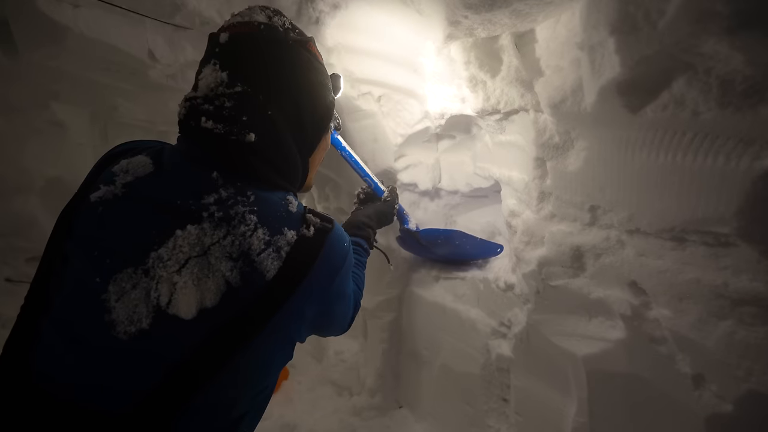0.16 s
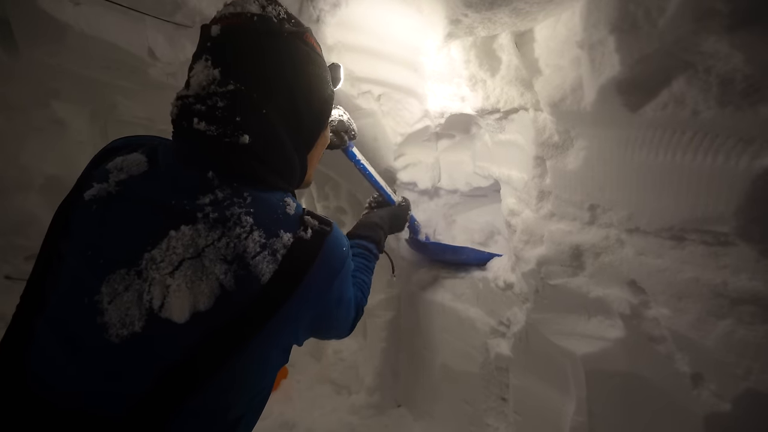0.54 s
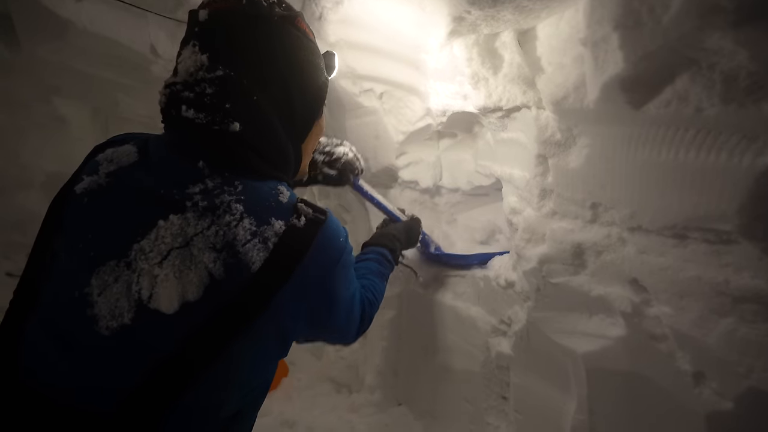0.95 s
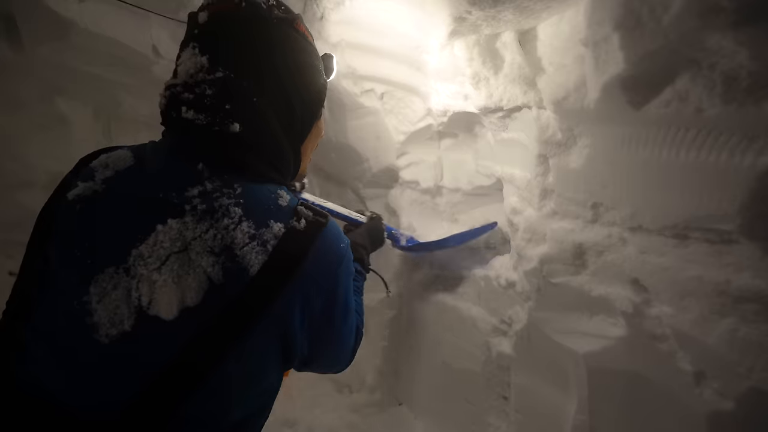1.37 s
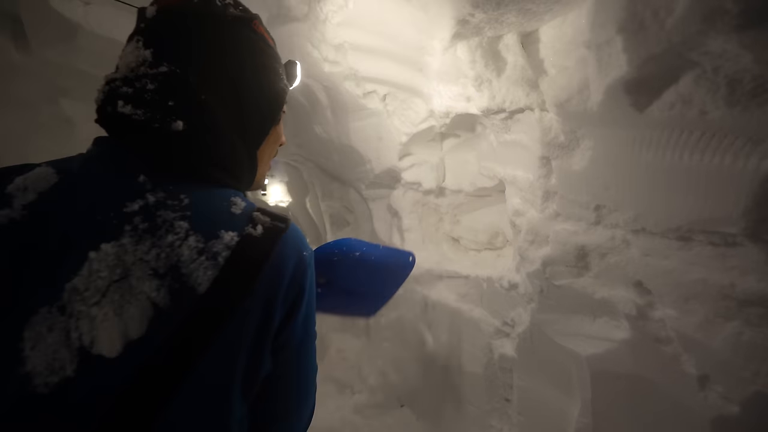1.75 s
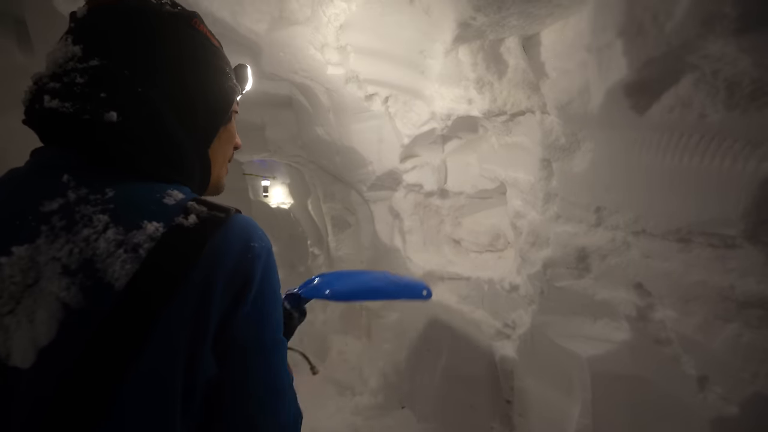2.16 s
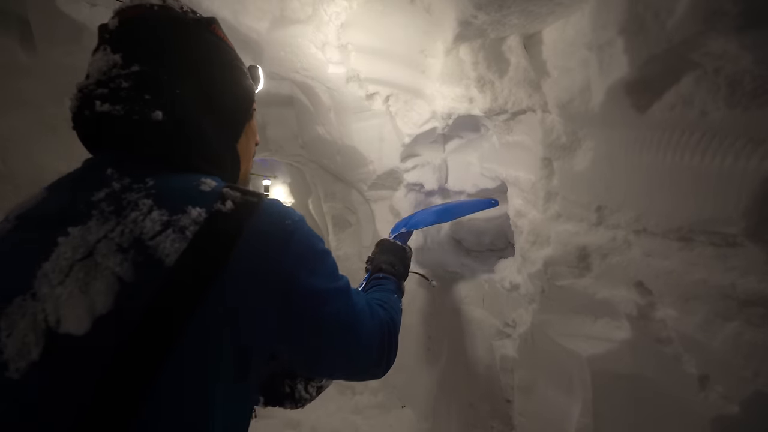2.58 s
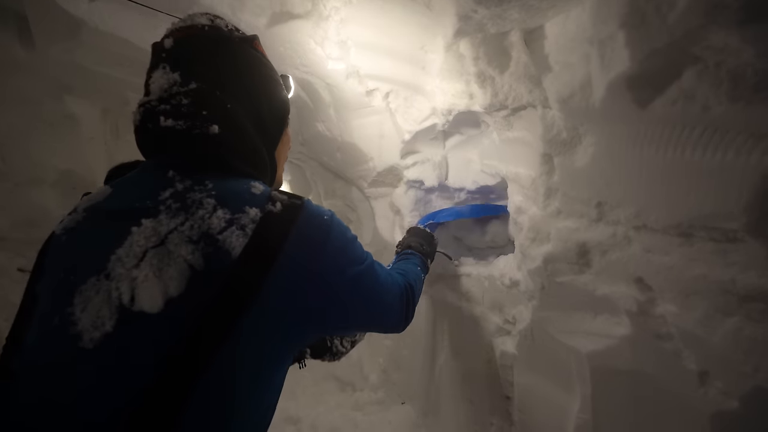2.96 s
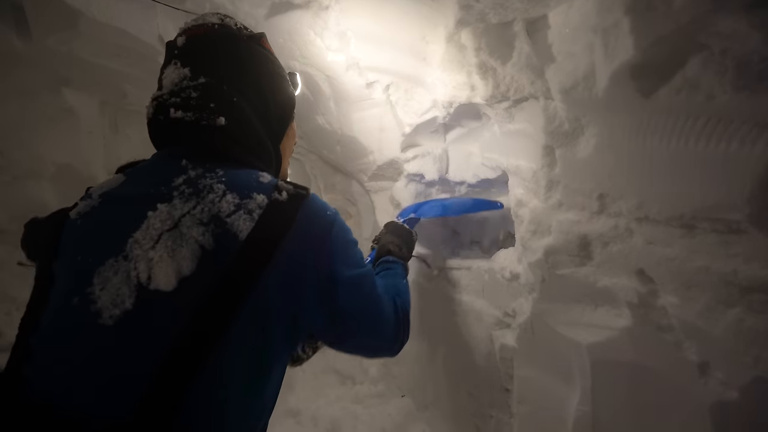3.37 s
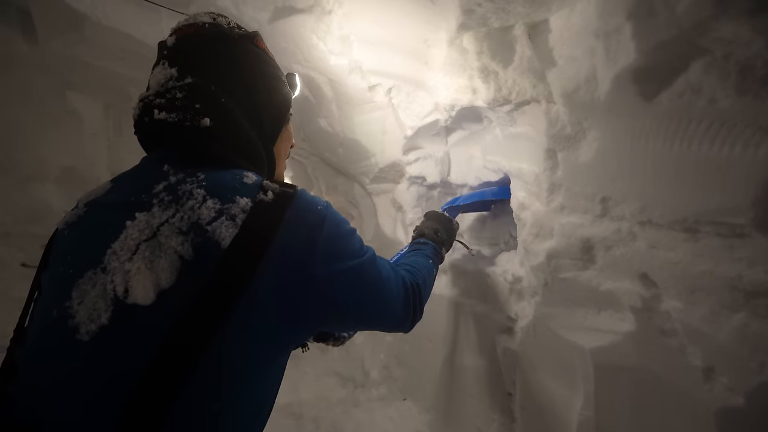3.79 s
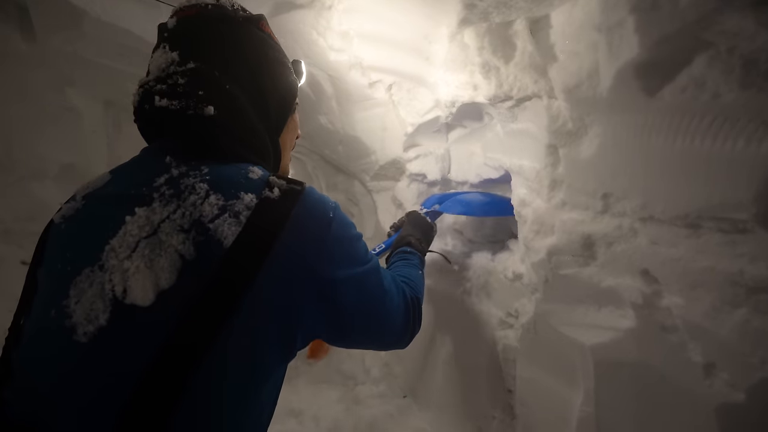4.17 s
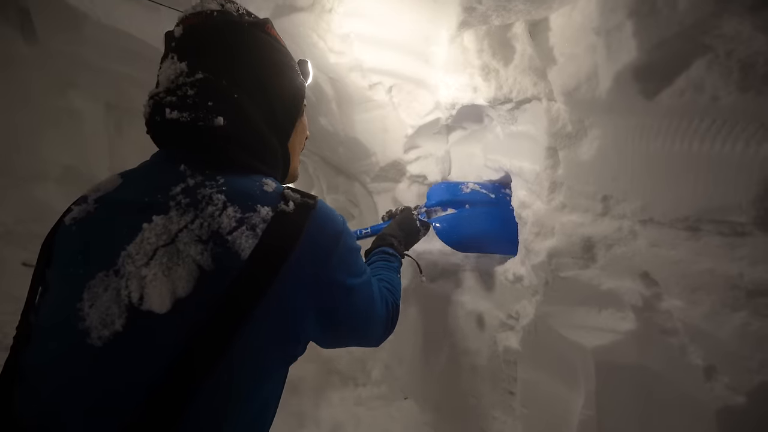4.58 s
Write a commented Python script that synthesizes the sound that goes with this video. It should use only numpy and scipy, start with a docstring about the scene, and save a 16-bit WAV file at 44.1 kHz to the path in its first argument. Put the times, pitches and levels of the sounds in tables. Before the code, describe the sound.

Close, dry shovel scrapes bite hard snow in two bouts, split by a quieter swing with sliding snow and faint metallic taps.

```python
"""Shovel carving a snow shelter

A small metal shovel cuts packed snow in quick short strokes: noise and breaking crystals drive the blade's
resonances, which change with how it is held. Between two bouts it swings clear, spills its load and taps
the wall, ringing as decaying sines. Crust snaps and lumps thud as filtered noise bursts; crumbs patter down,
stray granules tick, and the walls answer briefly over the quiet of the shelter."""
import sys
import numpy as np
from scipy import signal
from scipy.fft import rfft, irfft, next_fast_len
from scipy.io import wavfile
from scipy.ndimage import map_coordinates

SR = 44100
rng = np.random.default_rng(int(sys.argv[2]) if len(sys.argv) > 2 else 0)


def store_wav(level_fs):
    """Save 16-bit WAV to argv[1]."""
    pcm = np.round(np.clip(np.atleast_2d(level_fs), -1, 1) * 32767)
    wavfile.write(sys.argv[1], SR, pcm.T.astype(np.int16))


N = 208584

# Strokes into the wall. Each row: start of full force in seconds, force in dB, rise in s per 20 dB,
# hold in s, release in s per 20 dB, hiss in dB re force, crunch in dB re force (levels before the trims).
WALL_STROKES = [(0, -38, 0.02, 0.011, 0.043, -1.5, -30), (0.047, -45, 0.03, 0.0066, 0.011, -23, -21),
                (0.207, -32.5, 0.1, 0.024, 0.019, -2, -29), (0.31, -37, 0.078, 0.031, 0.047, -3, -23),
                (0.408, -40, 0.09, 0.011, 0.059, -0.5, -25.5),
                (0.506, -44.5, 0.024, 0.12, 0.043, -2.5, -22), (0.646, -30.5, 0.12, 0.032, 0.057, -2, -25),
                (0.704, -29, 0.013, 0.001, 0.022, -5.5, -23.5),
                (0.752, -50.0, 0.047, 0.25, 0.041, -4.5, -19),
                (0.862, -32.5, 0.056, 0.003, 0.05, -5, -20.5), (0.915, -49.5, 0.036, 0.02, 0.04, 0.5, -17),
                (1.054, -39.5, 0.094, 0.005, 0.025, -3.0, -20.5),
                (1.103, -45.5, 0.015, 0.003, 0.036, 2, -16), (1.145, -32, 0.044, 0.0062, 0.079, -3.5, -21),
                (1.22, -43, 0.041, 0.023, 0.082, -8, -26), (1.312, -38.5, 0.061, 0.015, 0.019, -5.5, -16.5),
                (1.358, -50.5, 0.067, 0.082, 0.084, -0.5, -23)]
# Broad colour of the cut wall. Each row: frequency in Hz, relative level in dB per Hz.
WALL_COLOUR = [(150, -44), (250, -32), (492, -24), (842, -16), (1060, -13.5), (1690, -1), (2560, -2.5),
               (2940, -1), (3490, -7), (4150, -5.5), (7360, -8.5), (7890, -7), (15800, -22.5)]
# Blade damped by the wall. Each row: resonance in Hz, width in Hz, lift in dB when pressed.
WALL_MODES = [(1850, 180, -1), (2360, 140, 5), (2872, 85, 9.5), (3130, 160, 1), (3433, 180, 9),
              (4700, 87, 5), (6330, 180, 6.5), (7080, 210, 6.5), (8540, 750, 1)]


def wall_cuts():
    """The edge bites into the wall in quick strokes and the packed snow holds the blade."""
    return scrape(WALL_STROKES, WALL_COLOUR, WALL_MODES, grain_db=-4, clump_db=3.5,
                  gain_db=-0.08, crunch_db=2.0, hiss_db=0.56, bite_db=-80)


# Strokes of the second bout. Each row: the same columns and units as WALL_STROKES.
NOTCH_STROKES = [(2.762, -49, 0.027, 0.15, 0.079, -3.5, -21.5),
                 (2.841, -46, 0.0063, 0.0036, 0.099, -26, -16),
                 (2.954, -36, 0.066, 0.081, 0.032, -4.5, -23.5),
                 (3.126, -44, 0.095, 0.003, 0.032, -5.0, -23.5),
                 (3.177, -37.5, 0.035, 0.001, 0.037, -4, -30),
                 (3.215, -46.5, 0.037, 0.13, 0.16, -4.0, -19.5),
                 (3.706, -48.5, 0.018, 0.14, 0.036, -1, -28)]
# Broad colour of the notch, also of the taps. Each row: frequency in Hz, relative level in dB per Hz.
NOTCH_COLOUR = [(150, -89), (250, -33.5), (887, -4.5), (1060, -15.5), (1370, -8.5), (1570, -10.5),
                (1690, -3.5), (2150, -4.5), (2340, -1), (3620, -9), (8910, -9), (15800, -23)]
# Blade damped by the notch. Each row: resonance in Hz, width in Hz, lift in dB when pressed.
NOTCH_MODES = [(1375, 180, 4), (1704, 22, 11.4), (1893, 83, 6), (2345, 63, 7.4), (2930, 66, 9),
               (3380, 130, 6), (5340, 71, 6), (6100, 73, 3.9), (7390, 110, 4.9), (9700, 70, 5)]


def notch_cuts():
    """The blade cuts a notch, with narrow resonances standing out of the scrape."""
    return scrape(NOTCH_STROKES, NOTCH_COLOUR, NOTCH_MODES, grain_db=-3, clump_db=1.4,
                  gain_db=1.5, crunch_db=1, hiss_db=0.5, bite_db=-60)


# Prising strokes. Each row: the same columns and units as WALL_STROKES.
PRISE_STROKES = [(3.896, -49.5, 0.031, 0.026, 0.03, -3.5, -23.5),
                 (3.938, -34, 0.0061, 0.096, 0.063, -3.5, -23.5),
                 (4.118, -42.5, 0.033, 0.038, 0.034, -4.5, -22), (4.202, -36, 0.13, 0.034, 0.03, -7, -22.5),
                 (4.32, -37, 0.29, 0.0094, 0.15, -8, -21.5),
                 (4.44, -50.5, 0.078, 0.058, 0.093, -1.5, -18.5), (4.649, -49, 0.13, 0.059, 0.1, -1, -24)]
# Broad colour of prised snow. Each row: frequency in Hz, relative level in dB per Hz.
PRISE_COLOUR = [(150, -48), (250, -37), (1020, -19), (1280, -8.5), (2260, -3), (2560, -7), (3430, -6),
                (3940, -11), (4300, -7.5), (5580, -16), (7490, -13), (15800, -26)]
# Blade damped while prising. Each row: resonance in Hz, width in Hz, lift in dB when pressed.
PRISE_MODES = [(1384, 54, 2.6), (1683, 40, 8.4), (2240, 54, 2), (2440, 56, 6.8), (2926, 85, 5.6),
               (3640, 79, 2.3), (7100, 220, 0.89)]


def prises():
    """The blade prises snow loose, mostly with slower swells of force."""
    return scrape(PRISE_STROKES, PRISE_COLOUR, PRISE_MODES, grain_db=-1.5, clump_db=-0.5,
                  gain_db=0.1, crunch_db=1.8, hiss_db=1.43, bite_db=-47)


# Grazing strokes. Each row: the same columns and units as WALL_STROKES.
GRAZE_STROKES = [(2.372, -41.5, 0.015, 0.001, 0.031, -9, -20.5),
                 (2.407, -44.5, 0.036, 0.001, 0.038, -7.5, -14.5),
                 (2.436, -40.5, 0.01, 0.01, 0.03, -12, -25),
                 (2.455, -34.5, 0.026, 0.0061, 0.041, -9.5, -19),
                 (2.495, -32.5, 0.033, 0.0024, 0.027, -13.0, -19),
                 (2.525, -42.5, 0.032, 0.065, 0.026, -8, -34)]
# Broad colour of the grazes. Each row: frequency in Hz, relative level in dB per Hz.
GRAZE_COLOUR = [(150, -65), (250, -41), (672, -11.5), (842, -10), (1470, -15.5), (1690, -4.5), (1970, -8),
                (2340, -4), (2600, -11), (4300, -9), (5880, -26.5), (15800, -35)]
# Blade while grazing. Each row: resonance in Hz, width in Hz, lift in dB when pressed.
GRAZE_MODES = [(820, 140, 4), (1330, 70, 5), (1730, 140, 7), (2170, 80, 5), (2350, 130, 7), (2900, 100, 6),
               (4200, 120, 4), (5200, 250, 4)]


def grazes():
    """The blade grazes the snow in brief brushes with little hiss."""
    return scrape(GRAZE_STROKES, GRAZE_COLOUR, GRAZE_MODES, grain_db=-2.5, clump_db=1.2,
                  gain_db=1, crunch_db=0.5, hiss_db=1, bite_db=-50)


# The load sliding off the blade. Each row: the same columns and units as WALL_STROKES.
SPILL_STROKES = [(1.502, -52.5, 0.0082, 0.0, 0.11, 0, -18), (1.585, -38.5, 0.025, 0.0018, 0.033, -0.5, -46),
                 (1.775, -48.5, 0.125, 0.11, 0.14, -6, -30), (1.945, -50, 0.11, 0.027, 0.036, 0.5, -16.5),
                 (2.014, -50, 0.019, 0.053, 0.077, 1, -35), (2.06, -43.5, 0.039, 0.068, 0.085, -4, -17.5),
                 (2.19, -60, 0.072, 0.119, 0.2, 1, -9.5)]
# Broad colour of spilling snow. Each row: frequency in Hz, relative level in dB per Hz.
SPILL_COLOUR = [(150, -64), (250, -30), (436, -20), (842, -4.5), (1040, -10.5), (1390, -6.5), (2190, -5),
                (2430, -2.5), (4860, -5.5), (5980, -11), (9390, -9), (15800, -16.5)]
# Blade under its load. Each row: resonance in Hz, width in Hz, lift in dB when pressed.
SPILL_MODES = [(1400, 200, 3), (1790, 150, 2), (2450, 300, 2), (3200, 500, 1.5)]


def spills():
    """The load slides off the blade, coloured by a few wide resonances."""
    return scrape(SPILL_STROKES, SPILL_COLOUR, SPILL_MODES, grain_db=-5.0, clump_db=4.0,
                  gain_db=0.6, crunch_db=1.2, hiss_db=0.5, bite_db=-59)


UNEVEN_DB, UNEVEN_PER_S = 0.76, 50  # the edge meets harder and softer snow


def scrape(strokes, snow, blade, grain_db, clump_db, gain_db, crunch_db, hiss_db, bite_db):
    """Breaking crystals drive the blade; the force of the stroke sets the level of crunch, body and hiss."""
    gains = effort(strokes)
    touching = gains[1] > amp(-95)
    t = np.flatnonzero(touching) / SR
    unevenness = amp(UNEVEN_DB * wobble(t, UNEVEN_PER_S))
    crush, force, rub = gains[:, touching] * unevenness
    grit = crystals(t, grain_db, clump_db)

    def lift(hz):
        """Summed resonance peaks of the blade in dB."""
        return sum(db / (1 + (2 * (hz - f) / width) ** 2) for f, width, db in blade)

    pressed = unit(coloured(grit, lambda hz: along(snow, hz) + lift(hz)))
    loose = unit(coloured(grit, lambda hz: along(snow, hz) + 1.5 * lift(hz)))
    # below bite_db the snow barely damps the blade, so its resonances stand out
    looseness = 1 / (1 + (force / amp(bite_db)) ** 2)
    tone = pressed + (loose - pressed) * looseness

    crunch = amp(crunch_db) * crush * unit(band(tone, 130, 1050))
    body = force * unit(band(tone, 1050, 4750))
    hiss = amp(hiss_db) * rub * unit(band(tone, 4750, SR))
    out = np.zeros((2, N))
    out[:, touching] = amp(gain_db) * (crunch + body + hiss)
    return out


HISS_LAW, CRUNCH_LAW = 0.99, 0.72  # dB of hiss and of crunch for each dB of force


def effort(strokes):
    """Gains of crunch, body and hiss: hiss follows the force almost dB for dB, crunch less steeply."""
    power = np.zeros((3, N))
    for s, force_db, rise, hold, release, hiss_db, crunch_db in strokes:
        push_db = np.maximum(swell(s, rise, hold, release), -200)
        crunch = crunch_db + CRUNCH_LAW * push_db
        hiss = hiss_db + HISS_LAW * push_db
        power += amp(force_db + np.array([crunch, push_db, hiss])) ** 2
    return np.sqrt(power)


# The edge is wide. Each row: frequency in Hz, share of its power that differs between the ports (0 to 1).
PORT_DIFFERENCE = [(300, 0.012), (1400, 0.064), (3000, 0.083), (7000, 0.98), (15000, 0.54)]


def crystals(t, grain_db, clump_db, per_second=1400, clump_rate=330):
    """Rubbing noise and breaking crystals at two ports, bunched as the edge sticks and slips."""
    here = np.round(t * SR).astype(int)
    # one stream common to both ports, then one for each port
    rub, size, chance = rng.standard_normal((3, N)), rng.standard_normal((3, N)), rng.random((3, N))
    grains = (chance[:, here] < per_second / SR) * size[:, here]
    bunching = amp(clump_db * np.tanh(wobble(t, clump_rate)))
    grit = (rub[:, here] + amp(grain_db) * unit(grains)) * bunching

    def apart(hz):
        return np.clip(along(PORT_DIFFERENCE, hz), 0, 1)

    common = filtered(grit[:1], lambda hz: np.sqrt(1 - apart(hz)))
    separate = filtered(grit[1:], lambda hz: np.sqrt(apart(hz)))
    return common + separate


# Glancing taps on the wall. Each row: start in seconds, blade ring in dB, crunch in dB before colouring,
# shaft ring in dB, rise in s, share of the free ring time (0 to 1).
WALL_TAPS = [(2.488, -37, -41, -70, .008, .4), (2.572, -29.5, -33, -57, .004, .55),
             (2.651, -40, -44, -48.5, .018, .9), (2.839, -43, -40, -70, .002, .45)]
# The blade ringing in free air. Each row: mode in Hz, level in dB re the tap's blade ring, free t60 in s.
FREE_MODES = [(1324, -12, .15), (1564, -6, .12), (1776, -3, .15), (1850, -7, .09), (2171, 0, .14),
              (2350, -3, .12), (2642, -7, .13), (2868, -8, .12), (3460, -8, .12), (3716, -11, .13),
              (4188, -7, .11), (5310, -11, .09), (6100, -13, .1), (7415, -9, .09)]
SHAFT_HZ, SHAFT_T60 = 1168, .85  # the hollow handle decays slowest; t60 in s


def taps():
    """The blade glances off the wall: a short crunch, a trickle of loosened snow, blade and shaft ring on."""
    out = np.zeros(N)
    for s, blade_db, crunch_db, shaft_db, rise, share in WALL_TAPS:
        for hz, db, t60 in FREE_MODES:
            mode_db = blade_db + db + rng.normal(0, 1)
            add(out, s, amp(mode_db) * ring(hz, rise, share * t60))
        add(out, s, amp(shaft_db) * ring(SHAFT_HZ, rise, SHAFT_T60))
        snow = burst(rise, 0.064) + amp(-14) * burst(rise, 0.5)  # crunch and trickle
        add(out, s, amp(crunch_db) * coloured(snow, lambda hz: along(NOTCH_COLOUR, hz) + 10))
    return out


def ring(hz, rise, t60):
    """One sine mode swells towards amplitude 1 and dies away, within half a second."""
    t = np.arange(SR // 2) / SR
    tone = np.sin(2 * np.pi * (hz * t + rng.random()))
    return tone * np.minimum(t / rise, 1) * np.exp(-np.log(1000) * np.maximum(t - rise, 0) / t60)


# Crust snapping. Each row: start in seconds, peak in dB, pitch in Hz.
CRUST_SNAPS = [(0.1528, -31, 2960), (0.4079, -22, 3500), (0.5055, -30.5, 1700), (0.646, -29.5, 794),
               (0.658, -17.5, 3030), (0.6648, -15, 3400), (0.7045, -31.5, 680), (0.8675, -17.5, 2060),
               (1.1045, -34, 6730), (1.1349, -21.5, 2880), (1.5798, -30.5, 1870), (1.687, -46, 1900),
               (1.9644, -41, 2940), (2.3682, -33, 1670), (2.8394, -30, 1710), (3.1755, -25.5, 2300),
               (3.2128, -28.5, 2720), (3.5112, -45, 1910), (3.9385, -14, 2840), (4.331, -20.5, 2100)]
# Small ice chips. Each row: start in seconds, peak in dB, pitch in Hz.
ICE_CHIPS = [(2.164, -31.5, 8900), (2.2372, -39, 3560), (2.3155, -37.5, 8000), (3.661, -46, 6000),
             (4.4285, -28, 5500)]


def snaps():
    """Bits of crust break off with a broad crack; ice chips give a short, clear tick."""
    out = np.zeros(N)
    for s, db, pitch_hz in CRUST_SNAPS:
        add(out, s, amp(db) * crack(pitch_hz, narrow=2.8, t60=0.018))
    for s, db, pitch_hz in ICE_CHIPS:
        add(out, s, amp(db) * crack(pitch_hz, narrow=5, t60=.009))
    return out


def crack(pitch_hz, narrow, t60):
    """A noise burst of peak 1 around one pitch, with the lows held back."""
    def colour(hz):
        octaves = np.log2((hz + 1) / pitch_hz)
        peak = -11 * np.log10(1 + (narrow * octaves) ** 2)
        return peak + along([(100, -31.0), (700, -4.0)], hz)

    x = coloured(burst(.0005, t60), colour)
    return x / np.abs(x).max()


def aimed(x, lag_us):
    """The right port hears the blade lag_us microseconds before the left."""
    side = np.array([[-1], [1]])
    return filtered(x, lambda hz: np.exp(1j * np.pi * hz * lag_us / 10 ** 6 * side))


# Where the blade works. Each row: time in seconds, left level re right in dB.
BALANCE = [(0, -2), (1.3, -3.5), (1.75, -.5), (2.66, 1), (2.9, -2), (3.8, -3), (4.23, 0), (4.73, -3.5)]


def placed(x):
    """The left-right balance glides as the blade works in different places."""
    seconds, left_db = np.transpose(BALANCE)
    balance_db = np.interp(np.arange(N) / SR, seconds, left_db)
    return amp(balance_db * np.array([[.5], [-.5]])) * x


# Heavy lumps giving way. Each row: start in seconds, peak in dB.
LUMP_THUDS = [(0.697, -78), (0.868, -63), (1.01, -45.5), (3.941, -66), (4.016, -54), (4.124, -48),
              (4.197, -53)]
# Low colour of tumbling snow. Each row: frequency in Hz, relative level in dB per Hz.
LUMP_COLOUR = [(25, -35), (60, -25), (90, -27), (125, -6.5), (190, -0.5), (300, 0), (450, -14), (900, -15),
               (3000, -100)]
# Loose snow sliding down. Each row: start of full level in seconds, level in dB, hold in s.
SNOW_SLIDES = [(0.048, -86, .01), (0.297, -74.5, .02), (.415, -87, .01), (0.52, -77, .02), (.7, -73, .02),
               (.87, -69.5, 0.068), (1.14, -74, .04), (1.27, -77, .02), (1.944, -76, 0.011),
               (2.085, -85, .01), (2.382, -75, .03), (2.472, -72, .025), (2.836, -73, 0.025),
               (3.003, -76, .02), (4.053, -67.5, 0.031), (4.1, -66, 0.07), (4.335, -75, 0.017)]
SLIDE_RISE_S, SLIDE_RELEASE_S = 0.033, .1  # per 20 dB
CRUMB_DB, CRUMB_SETTLE_S = -49.5, 0.047  # crumbs re the cutting sound, and their decay time constant


def lumps(cutting):
    """Soft snow tumbles in a low patter, after every cut and in slides, with a thud for each heavy lump."""
    t = np.arange(N) / SR
    flutter = amp(2.5 * wobble(t, 60))
    patter = unit(coloured(rng.standard_normal(N) * flutter, lambda hz: along(LUMP_COLOUR, hz)))
    keep = np.exp(-1 / (CRUMB_SETTLE_S * SR))
    cut_level = np.abs(cutting).mean(axis=0)
    crumbs = amp(CRUMB_DB) * signal.lfilter([1 - keep], [1, -keep], cut_level)
    slides = sum(amp(db + swell(s, SLIDE_RISE_S, hold, SLIDE_RELEASE_S)) for s, db, hold in SNOW_SLIDES)
    out = np.hypot(crumbs, slides) * patter
    for s, db in LUMP_THUDS:
        thud = coloured(burst(0.0025, 0.033), lambda hz: along(LUMP_COLOUR, hz))
        add(out, s, amp(db) * thud / np.abs(thud).max())
    return out


GRIT_PER_S, GRIT_HZ = 67, 2000  # granules a second, middle pitch
GRIT_DB, GRIT_SPREAD_DB = -55.5, 9  # middle peak level, spread either way


def granules():
    """Loosened granules drop at random, each with a faint tick of its own size and pitch."""
    out = np.zeros(N)
    for when, size, pitch in rng.uniform(-1, 1, (int(GRIT_PER_S * N / SR), 3)):
        s = (when + 1) / 2 * N / SR
        tick = crack(GRIT_HZ * 2 ** pitch, narrow=2.8, t60=.012)
        add(out, s, amp(GRIT_DB + GRIT_SPREAD_DB * size) * tick)
    return out


# Level of the walls' answer. Each row: frequency in Hz, walls re direct sound in dB.
WALL_ECHO = [(150, -30), (500, -18), (1500, -3.5), (3000, -1.5), (7000, -1), (15000, -5)]


def shelter(x, size=6144):
    """Close walls answer briefly; a fresh echo pattern fades in with every half-overlapping window."""
    echo = np.zeros((2, N + 4 * size))
    padded = np.pad(x, ((0, 0), (size, 2 * size)))
    for start in range(0, N + size, size // 2):
        window = padded[:, start:start + size] * np.hanning(size)
        answer = signal.fftconvolve(window, reflections(size=size // 2), axes=1)
        echo[:, start:start + answer.shape[1]] += answer
    return x + filtered(echo[:, size:size + N], lambda hz: amp(along(WALL_ECHO, hz)))


# How long the walls answer. Each row: frequency in Hz, t60 in s.
WALL_DECAY = [(150, 0.054), (1500, 0.03), (5000, 0.0086), (15000, 0.013)]


def reflections(size):
    """A short, diffuse answer of the porous walls at each port, energy 1, after 1/600 s."""
    hz, t, z = signal.stft(rng.standard_normal((2, size)), SR, nperseg=128)
    t60 = along(WALL_DECAY, hz)[:, None]
    decaying = z * np.exp(-np.log(1000) * t / t60) / np.sqrt(t60)
    tail = signal.istft(decaying, SR, nperseg=128)[1]
    tail = tail / np.linalg.norm(tail, axis=1, keepdims=True)
    return np.pad(tail, ((0, 0), (SR // 600, 0)))


# The quiet of the shelter. Each row: frequency in Hz, relative level in dB.
QUIET_COLOUR = [(18, -79), (30, -34), (413, -35), (459, -16), (662, -8.5), (955, -25), (1030, -17),
                (1120, -3), (1940, -19), (3450, -13), (15800, -23.5)]


def stillness():
    """The quiet of the shelter: steady coloured noise, independent at each port."""
    noise = rng.standard_normal((2, N))
    return amp(-64.5) * unit(filtered(noise, lambda hz: amp(along(QUIET_COLOUR, hz))))


def amp(db):
    """Decibels to gain."""
    return 10 ** (np.asarray(db) / 20)


def unit(x):
    """Scale to rms 1."""
    return x / np.sqrt(np.mean(x ** 2) + 1e-20)


def along(points, hz):
    """Read (Hz, value) points on a log frequency axis."""
    f, v = np.transpose(points)
    return np.interp(np.log(hz + 1), np.log(f + 1), v)


def wobble(t, rate):
    """A quick random flutter without slow drift, rate knots a second."""
    knots = np.diff(rng.standard_normal(SR // 10)) / np.sqrt(2)
    return map_coordinates(knots, [t * rate], mode="wrap")


def swell(s, rise, hold, release):
    """An envelope in dB: it climbs to 0 at time s, holds, then falls; rise and release each span 20 dB."""
    t = np.arange(N) / SR - s
    before = np.maximum(-t, 0) / max(rise, .002)
    after = np.maximum(t - hold, 0) / max(release, .002)
    return -20 * (before + after)


def filtered(x, response):
    """x times a response of frequency."""
    n = x.shape[-1]
    m = next_fast_len(n + 8192)
    return irfft(rfft(x, m) * response(np.fft.rfftfreq(m, 1 / SR)), m)[..., :n]


def coloured(x, level, size=8192):
    """x through a causal minimum-phase filter whose gain in dB is level(Hz), floored at -120."""
    level_db = np.maximum(level(np.fft.rfftfreq(size, 1 / SR)), -120)
    cepstrum = irfft(np.log(amp(level_db)))
    # folding the cepstrum forward makes the filter causal
    cepstrum[1:size // 2] *= 2
    cepstrum[size // 2 + 1:] = 0
    kernel = np.array(irfft(np.exp(rfft(cepstrum))), ndmin=x.ndim)
    return signal.fftconvolve(x, kernel, axes=-1)[..., :x.shape[-1]]


def band(x, lo_hz, hi_hz):
    """The part of x between two frequencies."""
    return filtered(x, lambda hz: (hz >= lo_hz) & (hz < hi_hz))


def burst(rise, t60):
    """A quarter second of noise that swells towards rms 1 and dies away."""
    t = np.arange(SR // 4) / SR
    decay = np.exp(-np.log(1000) * np.maximum(t - rise, 0) / t60)
    return rng.standard_normal(len(t)) * np.minimum(t / rise, 1) * decay


def add(track, s, sound):
    """Mix a sound into the track at time s."""
    part = track[max(round(s * SR), 0):][:len(sound)]
    part += sound[:len(part)]


def scene():
    """Two bouts of cutting with a swing of the shovel between them."""
    wall, notch, prise, graze = wall_cuts(), notch_cuts(), prises(), grazes()
    shovel = aimed(wall + notch + snaps(), lag_us=31.0)
    shovel = shovel + aimed(spills() + graze + prise + taps(), lag_us=39.0)
    falling = granules() + lumps(wall + graze + notch + prise)
    return shelter(placed(shovel) + falling) + stillness()


def record(dry):
    """The microphone tilts the sound towards the treble and keeps nothing above its band limit."""
    tilt = [(1000, -2.5), (3000, -0.58), (7000, -0.63), (15000, 3.5)]  # (Hz, dB)
    return filtered(dry, lambda hz: amp(along(tilt, hz)) * (hz < 15900))


dry = scene()
out = record(dry)
store_wav(out)
```